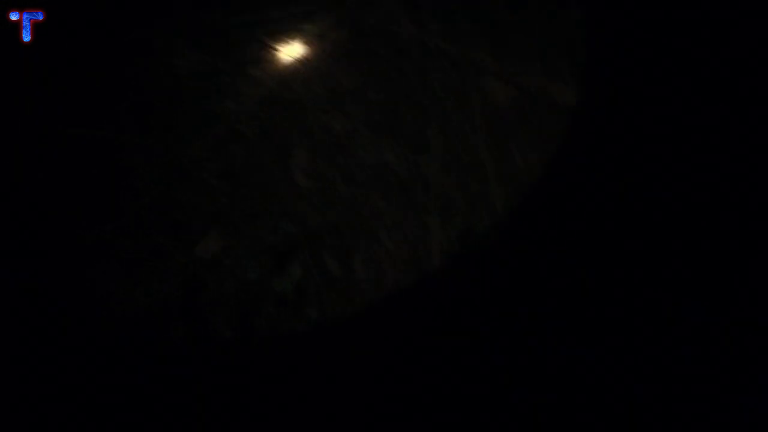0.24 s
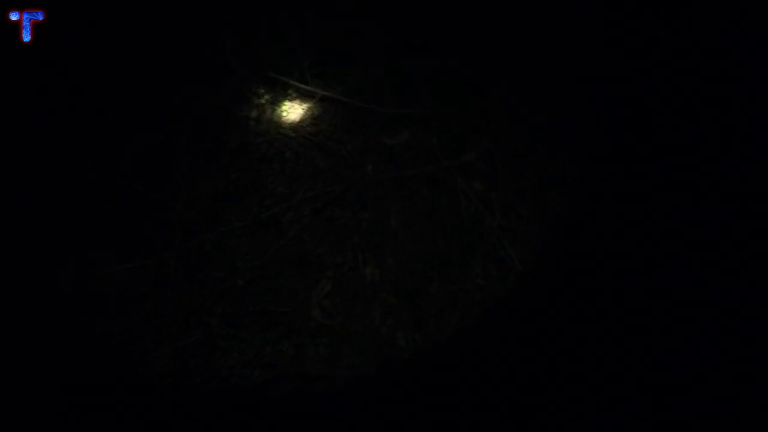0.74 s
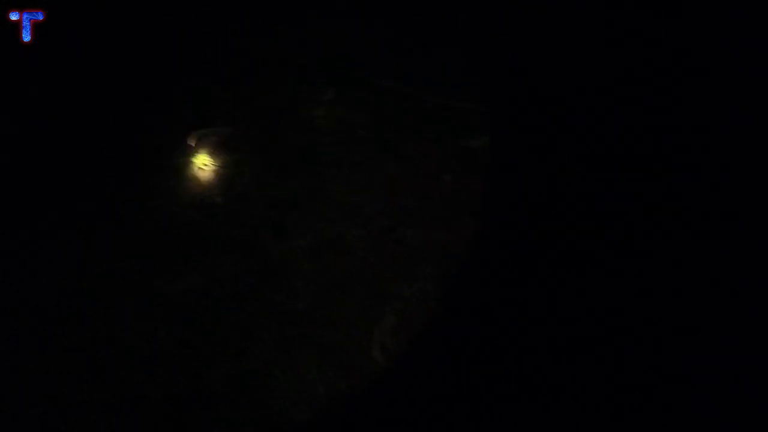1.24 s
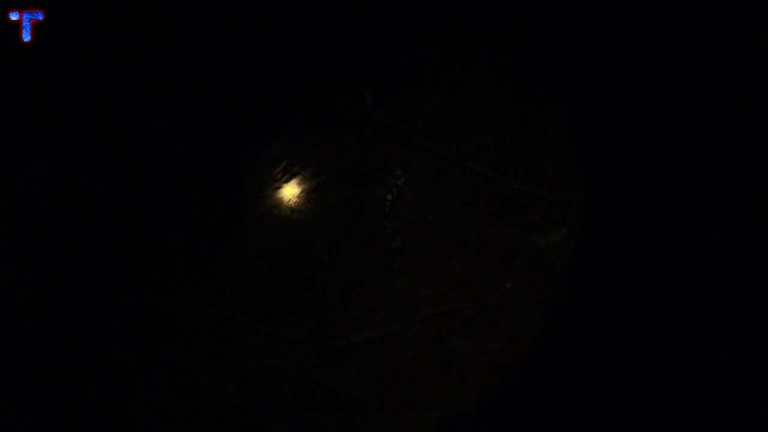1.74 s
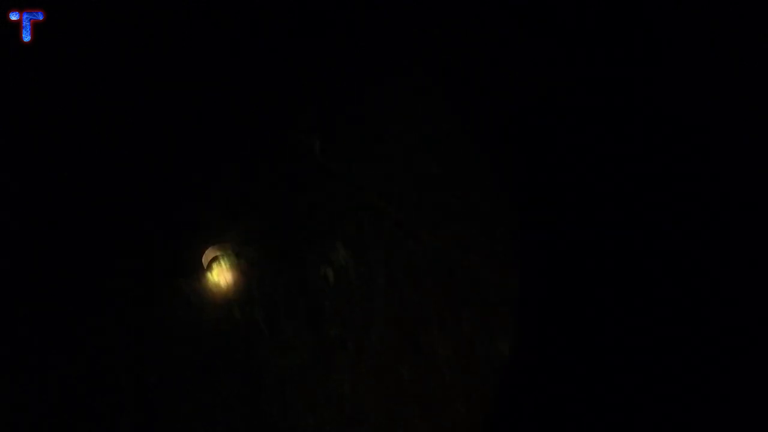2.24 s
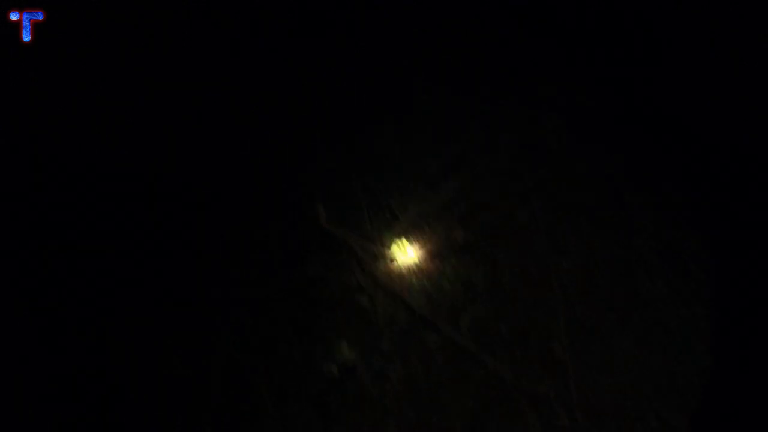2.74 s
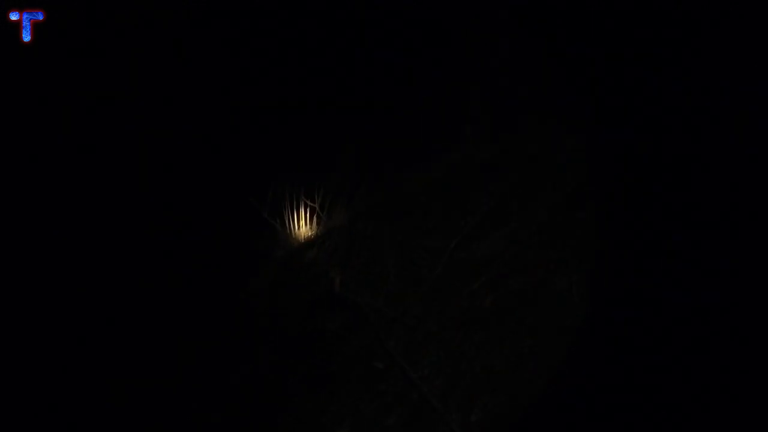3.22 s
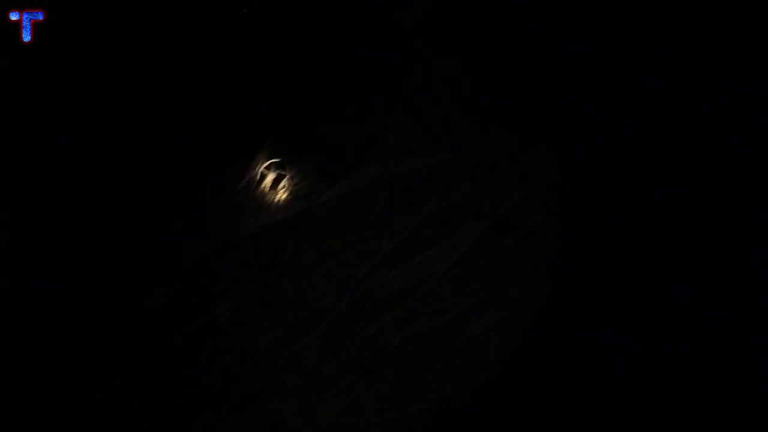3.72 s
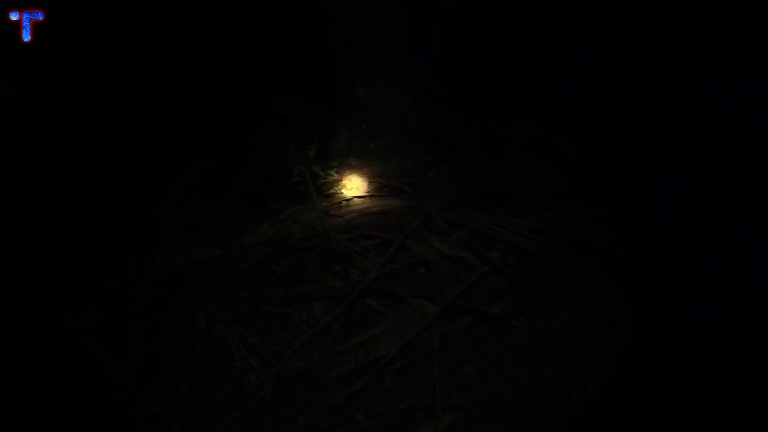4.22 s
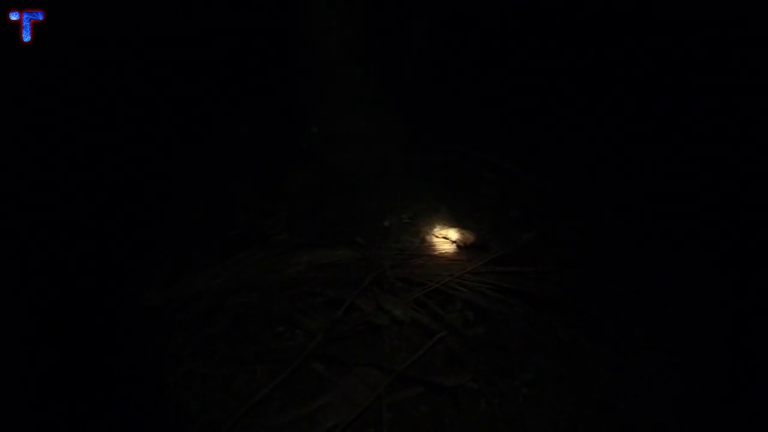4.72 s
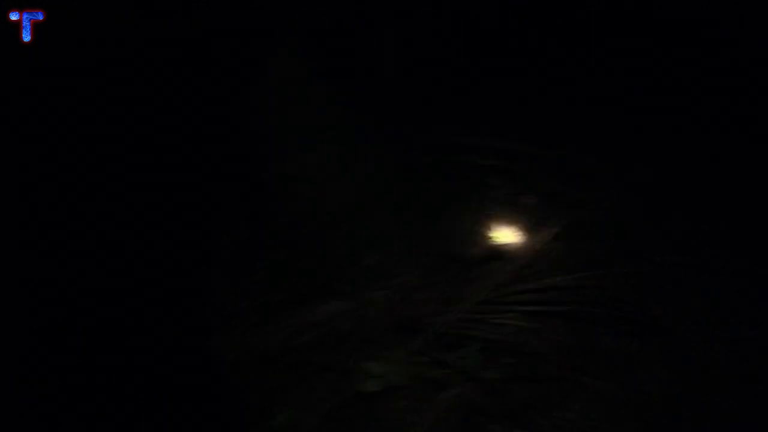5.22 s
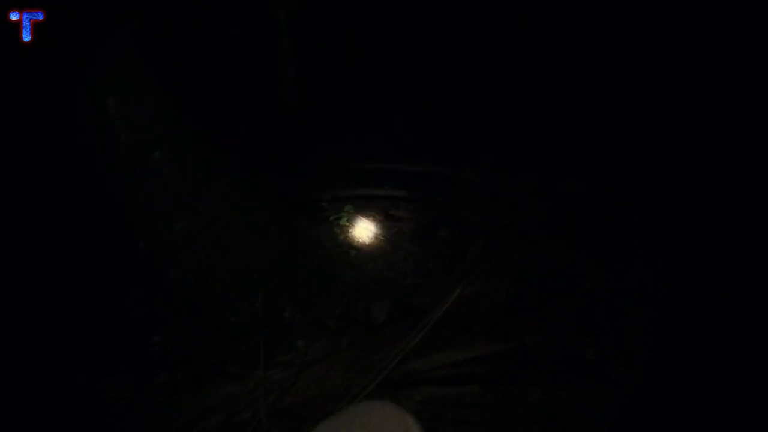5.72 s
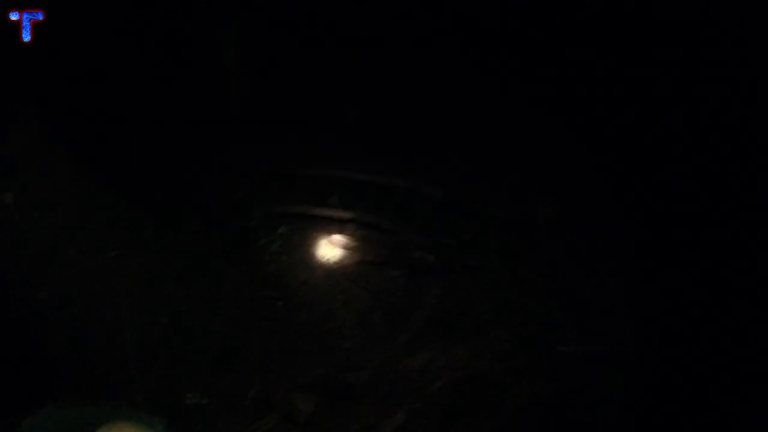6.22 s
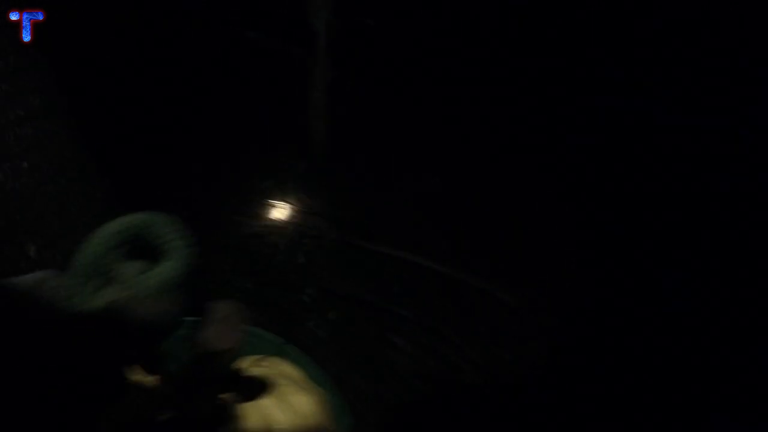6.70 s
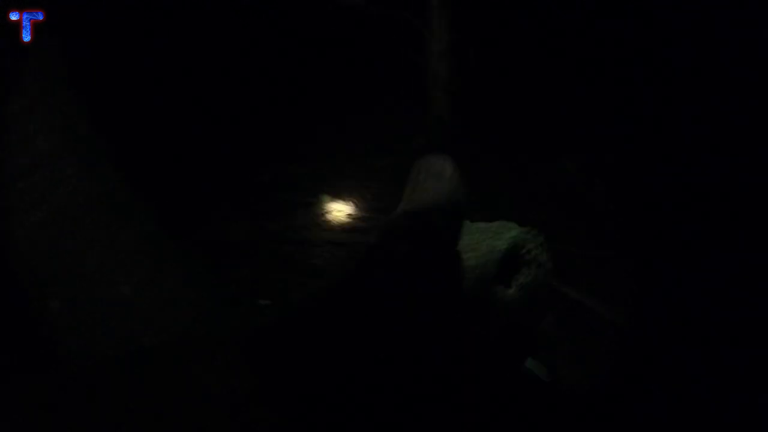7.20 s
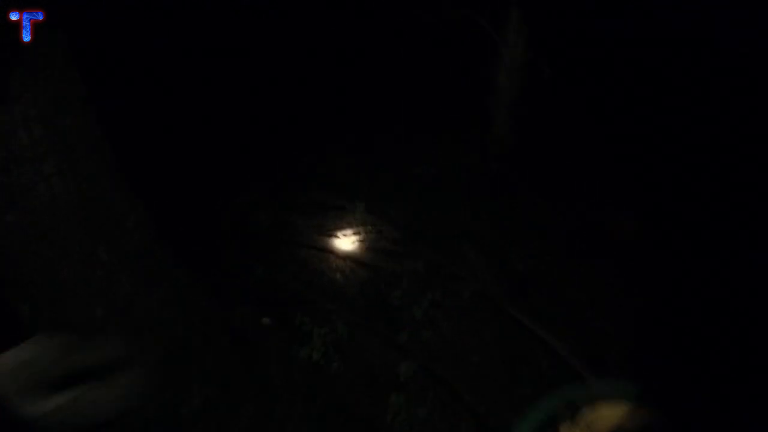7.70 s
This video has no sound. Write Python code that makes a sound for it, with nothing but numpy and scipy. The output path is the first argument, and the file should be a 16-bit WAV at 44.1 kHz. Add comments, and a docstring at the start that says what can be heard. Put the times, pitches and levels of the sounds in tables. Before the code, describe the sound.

Dense shrill frog chorus rattles over a wet night field, one frog very close, while a walker's clothes rub, feet thud and gear knocks.

```python
"""A wet field at night: dozens of frogs rattle in a dense chorus, one of them close by, and an insect chirps high above.
Each frog is a train of short pitched pulses; noise gives the far wash, the insect's resonant trill and the hiss.
Someone walks slowly through the grass with the microphone in hand: footfalls thud and carried gear knocks,
clothing rubs as shaped grains and noise, and stalks rustle in bursts of tiny impacts and snap."""
import sys
import numpy as np
from scipy import signal
from scipy.fft import rfft, irfft, next_fast_len
from scipy.io import wavfile
from scipy.ndimage import uniform_filter1d

SR = 44100
rng = np.random.default_rng(int(sys.argv[2]) if len(sys.argv) > 2 else 0)


def wav_record(signal):
    """Record a signal, one row per channel, as 16-bit PCM in the file named by sys.argv[1]."""
    frames = np.transpose(np.atleast_2d(signal))
    bounded = np.clip(frames, -1, 1)
    # unit amplitude maps onto the largest positive 16-bit level
    quanta = np.round(bounded * 32767).astype(np.int16)
    wavfile.write(sys.argv[1], SR, quanta)


N = 350595
T = np.arange(N) / SR

# All levels in the tables are relative; the mix trims them.
# loudness of the shrill frogs along the walk: (time [s], level [dB])
SHRILL_LEVEL = [(0, -21.5), (.27, -20.5), (.7, -21), (1.15, -21), (1.28, -19.5), (1.63, -19), (1.82, -22),
                (1.99, -18.5), (2.12, -20.7), (2.8, -19), (3, -22.5), (3.25, -20), (3.65, -20.5),
                (3.98, -22), (4.65, -20.5), (5.48, -22), (5.63, -25), (5.95, -21.5), (6.1, -25),
                (6.72, -20.5), (7.18, -23), (7.38, -20.5), (7.95, -21.5)]
# spectrum of the shrill frogs: (frequency [Hz], level [dB])
SHRILL_SPECTRUM = [(1700, -26), (2050, -18), (2500, -13.5), (2850, -8.5), (3200, -2), (3550, -2),
                   (3850, -0.5), (4000, -8), (4200, -14.5), (4600, -18), (5200, -27.5), (6000, -41),
                   (7500, -76)]
# rattles of the nearest frog:
# (time [s], length [s], pulse rate [Hz], starting level [dB], starting level of the bright edge [dB])
NEAR_RATTLES = [(.183, .04, 37.2, -8, -42), (.2573, .01, 40, -9, -32), (.3576, .01, 40, -12, -33),
                (1.3269, .035, 42.7, -8.5, -41), (1.4434, .045, 32.3, -8, -38), (1.5209, .01, 40, -17, -41),
                (1.5628, .08, 31.5, -7, -27.5), (1.6496, .04, 37.9, -9, -22.5), (1.9206, .01, 40, -16, -36),
                (1.9824, .095, 37, -10, -26), (2.4721, .04, 37.6, -11, -33), (2.575, .06, 46.5, -10, -32.5),
                (3.1434, .01, 40, -14, -32), (3.265, .11, 41.3, -8.5, -30.5),
                (3.4562, .09, 40.5, -9.5, -29), (3.5623, .035, 42, -9, -31),
                (3.6114, .065, 39.1, -9.5, -30), (7.7787, .04, 37.7, -14, -34)]
# single rattles and trills that rise out of the chorus:
# (time [s], length [s], pitch [Hz], pulse rate [Hz], peak level [dB])
SOLO_CALLS = [(0.763, 0.14, 1660, 78, -30), (1.059, 0.21, 1500, 69, -24.5), (1.731, 0.22, 1490, 58, -22.5),
              (2.422, 0.14, 1460, 85, -28), (3.595, 0.12, 1470, 83, -27.5), (4.042, 0.15, 4550, 115, -32),
              (4.199, 0.21, 1430, 51, -24.5), (4.553, 0.14, 4640, 110, -39), (6.495, .32, 4290, 65, -26),
              (7.103, .25, 1530, 40, -27), (7.71, 0.19, 4320, 120, -29)]
# loudness of the low frogs: (time [s], level [dB])
LOW_LEVEL = [(0, -31.5), (.6, -35), (1.5, -34), (2.7, -34), (3.7, -34), (4.6, -35), (5.1, -34), (6.1, -37),
             (6.6, -35), (7.95, -33.5)]
# spectrum of the low frogs: (frequency [Hz], level [dB])
LOW_SPECTRUM = [(1000, -25), (1200, -12.5), (1400, -2.5), (1620, 1.5), (1850, -3), (2200, -8), (2800, -53)]
# sleeves brushing the microphone: (centre time [s], level [dB], length [s])
SLEEVE_BRUSHES = [(.12, -26.5, 0.031), (.49, -32, 0.081), (1.02, -29.5, 0.12), (1.15, -35, .05),
                  (1.29, -29, 0.059), (1.4, -34, .04), (1.61, -34.5, 0.18), (1.81, -30.5, 0.12),
                  (2.11, -19, 0.054), (2.21, -30, 0.03), (2.32, -25, 0.038), (2.48, -25, 0.025),
                  (2.69, -30, 0.11), (2.88, -24.5, 0.16), (3.04, -23, 0.06), (3.12, -24, 0.065),
                  (3.53, -31, 0.028), (3.635, -21.5, 0.066), (3.8, -24, 0.15), (3.96, -26, 0.22),
                  (4.2, -38.5, 0.15), (4.36, -31, 0.044), (4.87, -26, 0.11), (5.04, -32, 0.34),
                  (5.21, -32, 0.16), (5.61, -26, 0.093), (5.7, -26, .05), (5.88, -29, 0.065),
                  (6.09, -26, 0.14), (6.31, -23, 0.11), (6.72, -28, 0.055), (6.92, -31.5, .08),
                  (7.06, -23, 0.13), (7.22, -27, 0.11), (7.29, -21.5, 0.021), (7.54, -25, 0.12),
                  (7.67, -21.5, 0.074), (7.88, -19, 0.16)]
# steady rub of clothes under the brushes: (time [s], level [dB])
CLOTHES_LEVEL = [(0, -37.5), (1.5, -38), (2.5, -38), (3.4, -40), (4.5, -37.5), (5.3, -32.5), (6.6, -33),
                 (7.95, -34)]
# spectrum of rubbing cloth: (frequency [Hz], level [dB])
RUB_SPECTRUM = [(70, -5), (120, -7), (170, 2.5), (270, -3.5), (400, 0.5), (480, -7.5), (580, -18.5),
                (900, -21), (1200, -36), (2500, -58), (10000, -82)]
# strides, each swaying the hand: (centre time [s], level [dB], length [s])
STRIDE_SWAYS = [(.2, -29.5, 0.28), (1.35, -33, 0.13), (2.13, -33, .15), (2.9, -18, 0.075),
                (3.1, -27.5, 0.13), (3.93, -20, 0.18), (5.2, -27, 0.18), (6.06, -18.5, 0.13),
                (7.08, -23.5, .24), (7.86, -25, 0.22)]
# spectrum of the swaying hand: (frequency [Hz], level [dB])
SWAY_SPECTRUM = [(12, -10), (25, 4), (55, 0.5), (90, -4.5), (140, -7.5), (250, -11), (500, -64)]
# footfalls and jolts of the hand: (centre time [s], peak level [dB], pitch [Hz])
FOOT_THUDS = [(1.332, -17.5, 28), (2.118, -10, 185), (2.888, -6.5, 77.5), (2.923, -16, 35),
              (2.947, -11.5, 50), (3.897, -23, 45), (3.962, -13, 35), (5.063, -11, 156), (5.803, -12, 190),
              (5.879, -10, 163), (6.036, -9, 39.7), (6.082, -15, 35), (7.035, -17, 30), (7.053, -2.5, 113),
              (7.107, -14, 75)]
# light knocks of carried gear and twigs: (time [s], peak level [dB], main pitch [Hz], decay by 60 dB [s])
GEAR_KNOCKS = [(2.11, -25, 378, 0.044), (2.115, -17, 855, 0.022), (2.77, -11.5, 366, 0.035),
               (2.848, -26, 1130, .05), (2.887, -16, 594, .03), (3.614, -14.5, 330, 0.34),
               (3.894, -9.5, 560, 0.012), (4.184, -15, 1420, 0.022), (6.338, -12, 390, 0.017),
               (6.45, -12, 417, 0.11), (6.987, -13.5, 1000, 0.014), (7.214, -9, 338, 0.033),
               (7.283, -10, 343, 0.039)]
# grass brushed by the legs: (time [s], level [dB], length [s])
GRASS_RUSTLES = [(1.31, -49, 0.026), (2.097, -46, 0.033), (2.716, -48, 0.04), (2.84, -48, 0.053),
                 (3.62, -47, 0.028), (3.815, -46, 0.063), (5.985, -46, 0.039), (6.598, -40, 0.034),
                 (6.68, -48, 0.078), (6.99, -46.5, 0.037), (7.425, -46, 0.055), (7.8, -51, 0.045)]
# stalks that snap: (time [s], level [dB], length [s])
STALK_SNAPS = [(2.802, -40, .003), (2.847, -29.5, 0.0019), (2.946, -37, .002), (2.971, -38, .002),
               (3.002, -47, .002), (3.048, -44, 0.0019), (6.012, -41, .003), (6.693, -29.5, 0.0064),
               (6.969, -42, .002)]
# spectrum of grass and stalks: (frequency [Hz], level [dB])
GRASS_SPECTRUM = [(2500, 0), (6000, 1), (7800, 9.5), (9500, 7.5), (12000, -3.5), (15500, -10)]
# the high insect: (time [s], level [dB], chirp depth [0-1])
INSECT_LEVEL = [(0, -56.5, 0), (1.5, -54.5, 0.1), (3.6, -53, 0), (4.2, -55, 0.1), (4.6, -54.5, .8),
                (5.8, -57, 0.6), (6.3, -63, .4), (7.1, -56, 0), (7.95, -51, 0.3)]
# spectrum of the faint hiss of far insects and air: (frequency [Hz], level [dB])
HISS_SPECTRUM = [(200, 23), (700, -8), (1100, 1), (3000, 16.5), (6000, 2), (7000, 3), (9500, 3),
                 (10800, -19), (11500, -20), (12300, -8), (15500, -9)]


def undb(db):
    """Decibels to gain."""
    return 10 ** (np.asarray(db) / 20)


def unit(x):
    """Scale to rms 1."""
    return x / np.sqrt(np.mean(x ** 2) + 1e-18)


def gain_curve(table):
    """Gain for every sample from a table of times and levels."""
    s, db = np.transpose(table)
    return undb(np.interp(T, s, db))


def colour(x, spectrum):
    """Filter by a spectrum drawn over log frequency; rms 1."""
    hz, db = np.transpose(spectrum)
    size = next_fast_len(N)
    f = np.maximum(np.fft.rfftfreq(size, 1 / SR), 1)
    gain = undb(np.interp(np.log(f), np.log(hz), db))
    return unit(irfft(rfft(x, size) * gain, size)[:N])


def wander(rate_hz):
    """Random drift: straight lines between normal random values, rate_hz of them a second."""
    knots = rng.standard_normal(4096)
    return np.interp(T * rate_hz, np.arange(len(knots)), knots)


def add(out, s, x):
    """Mix x into out from time s."""
    i = max(int(s * SR), 0)
    out[i:i + len(x)] += x[:max(N - i, 0)]


def grains(rate_hz, spread_db):
    """Random tiny impacts of uneven size; rms 1."""
    hits = rng.random(N) < rate_hz / SR
    sizes = rng.standard_normal(N) * undb(spread_db * rng.standard_normal(N))
    return unit(hits * sizes)


def swells(table, edge):
    """Rounded swells, each centred on its time; their powers add, and edge sets the steepness."""
    power = np.zeros(N)
    for s, db, length in table:
        power += undb(2 * db) * np.exp(-np.abs(2 * (T - s) / length) ** edge)
    return np.sqrt(power)


def bursts(table):
    """Envelopes that rise quickly and fade more slowly."""
    out = np.zeros(N)
    for s, db, length in table:
        u = 3 * T[:SR // 2] / length  # the crest comes after a third of the length
        add(out, s, undb(db) * u * np.exp(1 - u))
    return out


def sac_pulses(times, sizes, hz, rise_s):
    """Each pulse swells and dies in the vocal sac, a few milliseconds of one slightly scattered pitch."""
    t = np.arange(SR // 70) / SR
    shape = (t / rise_s * np.exp(1 - t / rise_s)) ** 2
    chance = rng.standard_normal((len(times), 2))
    pitch = hz * (1 + 0.013 * chance[:, :1])
    waves = np.sin(2 * np.pi * (pitch * t + chance[:, 1:])) * shape * sizes[:, None]
    index = (np.maximum(times, 0) * SR).astype(int)[:, None] + np.arange(len(t))
    return np.bincount(index.ravel(), waves.ravel(), N)[:N]


def rattle(hz, pulse_hz, rise_s, call_s, duty):
    """One frog: pulse trains that swell, fade and drift in pitch; a duty below 1 leaves rests between them."""
    own = rng.standard_normal(2)  # this frog's own pulse rate and call length
    chance = rng.standard_normal((400, 2))
    beats = rng.random() + np.cumsum(1 + .06 * chance[:, 0]) - 1
    times = beats / (pulse_hz * (1 + .05 * own[0]))
    calls = times / (call_s * np.exp(.25 * own[1])) + rng.random()
    effort = np.sqrt(np.abs(np.sin(np.pi * np.minimum(calls % 1 / duty, 1))))
    drift = np.interp(calls, np.arange(len(times)), rng.standard_normal(len(times)))
    sizes = effort * undb(1.5 * chance[:, 1])
    return unit(sac_pulses(times, sizes, hz * (1 + 0.021 * drift[:, None]), rise_s))


def field(x, t60, wet_db):
    """Diffuse scatter from plants and banks: fading noise tails, a fresh one every quarter second."""
    t = T[:SR // 2]
    fade = undb(-60 * t / t60)
    window = np.hanning(len(t))
    wet = np.zeros(N)
    for i in range(0, N, len(t) // 2):
        piece = x[i:i + len(t)]
        tail = rng.standard_normal(len(t)) * fade / np.linalg.norm(fade)
        add(wet, i / SR, signal.fftconvolve(piece * window[:len(piece)], tail))
    return x + undb(wet_db) * wet


def shrill_frogs():
    """Rattlers spread over the field; the farthest melt into a wash of noise."""
    crowd = np.zeros(N)
    for hz in np.linspace(1950, 4150, num=32):
        crowd += rattle(hz, pulse_hz=39.13, rise_s=.0012, call_s=.45, duty=1.0)
    crowd = colour(field(unit(crowd), t60=.3, wet_db=-8), SHRILL_SPECTRUM)
    wash = unit(rng.standard_normal(N) * undb(wander(9)))
    return unit(crowd + .65 * colour(wash, SHRILL_SPECTRUM))


def overtones(voice, second_db, third_db):
    """Faint second and third harmonics that flicker with the pulses of the chorus."""
    z = signal.hilbert(voice, next_fast_len(N))[:N]
    turn = np.exp(1j * np.angle(z))  # each turn raises the harmonic by one
    return np.real(z * np.abs(z) * (undb(second_db) * turn + undb(third_db) * turn ** 2))


def near_frog(pitch_hz, edge_hz, rise_s, edge_rise_s, near_db, edge_db):
    """Short rattles that start strong and fade; at its crest each pulse gets a brief, bright edge near the third harmonic."""
    fade_db_per_s, edge_fade_db_per_s = 27, 87
    scatter_db, weak_pulse_db = 2, 3  # uneven edges; every second pulse is duller
    out = np.zeros(N)
    for start, length, pulse_hz, db, bright_db in NEAR_RATTLES:
        t = np.arange(0, length, 1 / pulse_hz)
        body = undb(db + near_db - fade_db_per_s * t)
        out += sac_pulses(start + t, body, pitch_hz, rise_s)
        uneven = scatter_db * rng.standard_normal(len(t)) - weak_pulse_db * (np.arange(len(t)) % 2)
        edge = undb(bright_db + edge_db + uneven - edge_fade_db_per_s * t)
        crest_lag = rise_s - edge_rise_s  # brings both crests together
        out += sac_pulses(start + t + crest_lag, edge, edge_hz, edge_rise_s)
    return out


def callers(rise_s):
    """Frogs at middle distance: one pulse train each, swelling and fading, with field scatter."""
    out = np.zeros(N)
    for start, length, hz, pulse_hz, db in SOLO_CALLS:
        t = np.arange(0, length, 1 / pulse_hz)
        effort = np.sqrt(np.abs(np.sin(np.pi * t / length)))
        out += sac_pulses(start + t, undb(db) * effort, hz, rise_s)
    return field(out, t60=0.45, wet_db=-8.0)


def low_frogs():
    """Larger frogs further off, with shorter, deeper rattles over a noise wash."""
    crowd = np.zeros(N)
    for hz in np.linspace(1300, 1850, num=10):
        crowd += rattle(hz, pulse_hz=37.95, rise_s=0.002, call_s=.5, duty=0.54)
    crowd = colour(field(unit(crowd), t60=0.29, wet_db=-6.5), LOW_SPECTRUM)
    return unit(crowd + undb(1) * colour(rng.standard_normal(N), LOW_SPECTRUM))


def clothing(rub_db, swish_db):
    """Cloth slips in small separate jerks against the microphone, over a fine rub and a faint swish."""
    rub = np.hypot(swells(SLEEVE_BRUSHES, edge=2.9), gain_curve(CLOTHES_LEVEL))
    slips = grains(140, 1) + 1.1 * grains(3000, 2)
    cloth = colour(slips * undb(1.56 * wander(45)), RUB_SPECTRUM)
    swish = colour(grains(3000, 1.9), GRASS_SPECTRUM)
    return (cloth + undb(swish_db) * swish) * rub * undb(rub_db)


def swaying_hand(sway_db, tremor_db):
    """The hand rumbles the microphone with each stride and trembles between strides."""
    sway = np.hypot(swells(STRIDE_SWAYS, edge=1.2), undb(tremor_db))
    return colour(rng.standard_normal(N), SWAY_SPECTRUM) * sway * undb(sway_db)


def thuds(thud_db):
    """A thud pushes the microphone once each way."""
    out = np.zeros(N)
    t = T[:SR // 5]
    for s, db, hz in FOOT_THUDS:
        u = 2 * np.pi * hz * (t - t.mean())
        add(out, s - t.mean(), -undb(db + thud_db) * u * np.exp((1 - u ** 2) / 2))
    return out


def knocks(knock_db):
    """A knock rings briefly in a few damped modes."""
    modes = [(.72, 0.42), (.86, 0.26), (1, 1), (1.27, 0.28)]  # (ratio to the main pitch, size)
    out = np.zeros(N)
    t = T[:SR // 5]
    for s, db, hz, t60 in GEAR_KNOCKS:
        ring = sum(size * np.sin(2 * np.pi * hz * ratio * t) for ratio, size in modes)
        ring = ring * undb(-60 * t / t60) * (1 - np.exp(-t / .0008))  # softened onset
        add(out, s, undb(db + knock_db) * ring / np.abs(ring).max())
    return out


def grass(rustle_db, snap_db):
    """Stalks crackle in bursts of tiny impacts as the legs pass, and a few snap in short bursts of noise."""
    crackle = colour(grains(2200, 4), GRASS_SPECTRUM) * bursts(GRASS_RUSTLES)
    snaps = colour(rng.standard_normal(N), GRASS_SPECTRUM) * bursts(STALK_SNAPS)
    return crackle * undb(rustle_db) + snaps * undb(snap_db)


def insect(pitch_hz, insect_db):
    """Wing strokes on a narrow resonance: a trill that at times breaks into about seven even chirps a second."""
    stroke_hz = 111.6  # average wing strokes a second
    chirp_s, chirp_crest_s = .138, 4.63  # chirp period and the moment of one crest
    s, db, depth = np.transpose(INSECT_LEVEL)
    chirps = 1 + np.interp(T, s, depth) * np.cos(2 * np.pi * (T - chirp_crest_s) / chirp_s)
    strokes = np.sin(np.pi * np.cumsum(stroke_hz * (1 + 0.0483 * wander(7.9))) / SR) ** 2
    wing = rng.standard_normal(N) * strokes
    for sharpness in (18, 8):
        wing = signal.lfilter(*signal.iirpeak(pitch_hz, sharpness, fs=SR), wing)
    return unit(wing * chirps) * undb(np.interp(T, s, db) + insect_db)


def far_hiss(hiss_db):
    """Far insects and air: coloured noise with a fast, random flutter in level."""
    flutter = undb(3.9 * wander(160))
    return colour(rng.standard_normal(N) * flutter, HISS_SPECTRUM) * undb(hiss_db)


def scene():
    """Frogs, walker, insect and hiss at one microphone."""
    voice = shrill_frogs()
    voice = voice + overtones(voice, second_db=-45.0, third_db=-43.5)
    frogs = voice * gain_curve(SHRILL_LEVEL) * undb(0.05)
    frogs += near_frog(pitch_hz=3780, edge_hz=11000, rise_s=.0013, edge_rise_s=.00042, near_db=-.5, edge_db=6.5)
    frogs += callers(rise_s=0.0022)
    frogs += low_frogs() * gain_curve(LOW_LEVEL) * undb(-0.64)
    walker = clothing(rub_db=1.5, swish_db=-40.5) + swaying_hand(sway_db=-0.5, tremor_db=-36)
    walker += thuds(thud_db=-0.5) + knocks(knock_db=-3.0) + grass(rustle_db=2.5, snap_db=3.0)
    background = insect(pitch_hz=8620, insect_db=-3.0) + far_hiss(hiss_db=-44.5)
    return (frogs + walker + background)[None]


def duck(x, threshold_db, amount):
    """Gain control: while the short-term loudness passes the threshold, everything is turned down."""
    loud = np.sqrt(np.abs(uniform_filter1d(x ** 2, size=900)))  # over about 20 ms
    over = np.maximum(loud / undb(threshold_db) - 1, 0)
    return x / (1 + amount * over)


def record(dry, limit_db=-7.5):
    """The gain ducks under loud bumps, a fast limiter holds down the loudest treble peaks; the top is cut."""
    dry = duck(dry, threshold_db=-16.5, amount=0.28)
    bass = signal.sosfiltfilt(signal.butter(2, 1000, fs=SR, output="sos"), dry)
    treble = dry - bass
    envelope = np.sqrt(2 * np.abs(uniform_filter1d(treble ** 2, size=40)))
    gain = (1 + (envelope / undb(limit_db)) ** 6) ** (-1 / 6)
    top_cut = signal.ellip(8, .2, 70, 15700, fs=SR, output="sos")  # steep low-pass at 15.7 kHz
    return signal.sosfilt(top_cut, bass + gain * treble)


dry = scene()
out = record(dry)
wav_record(out)
```